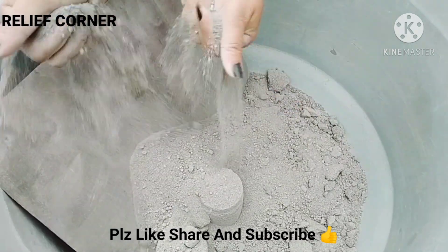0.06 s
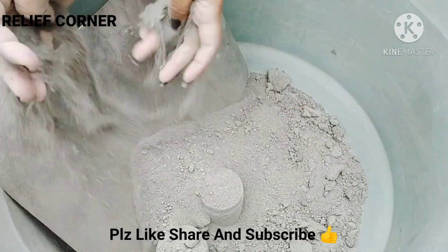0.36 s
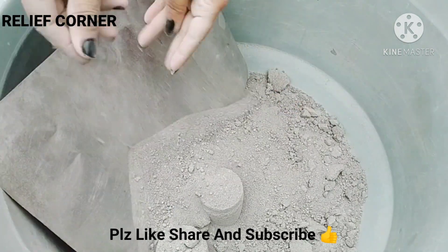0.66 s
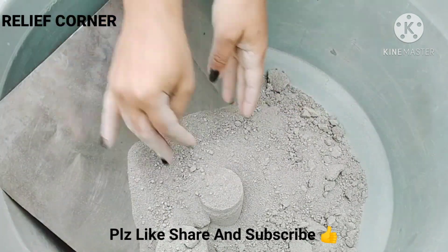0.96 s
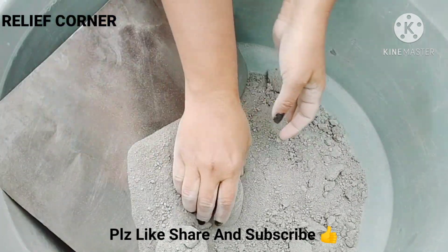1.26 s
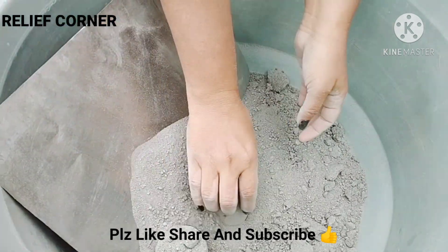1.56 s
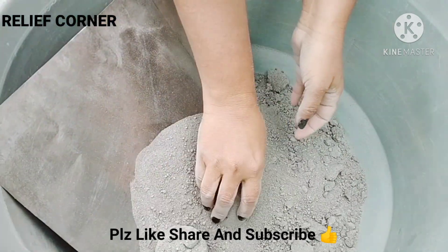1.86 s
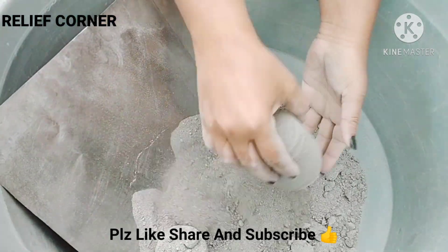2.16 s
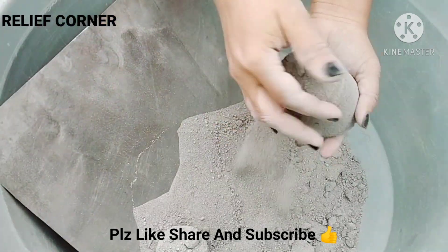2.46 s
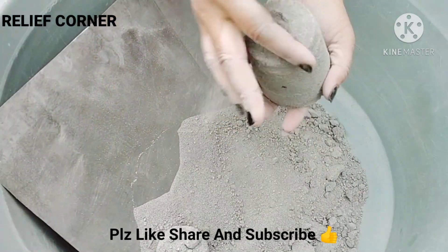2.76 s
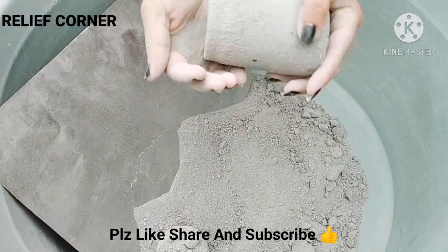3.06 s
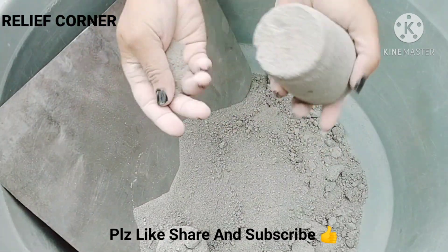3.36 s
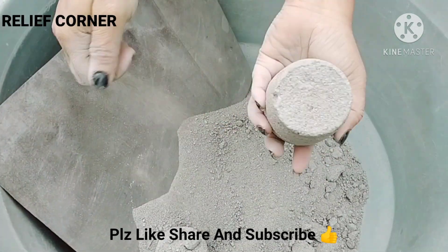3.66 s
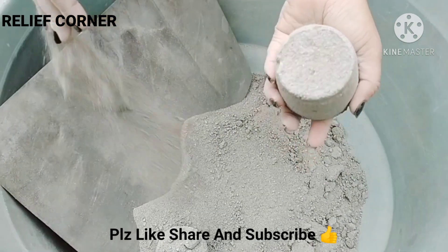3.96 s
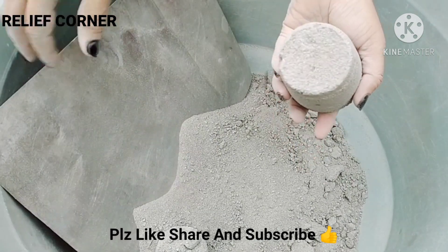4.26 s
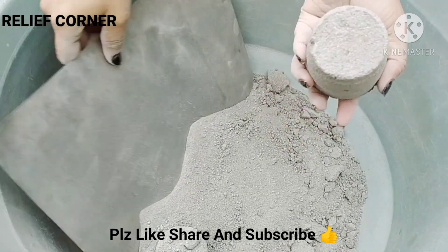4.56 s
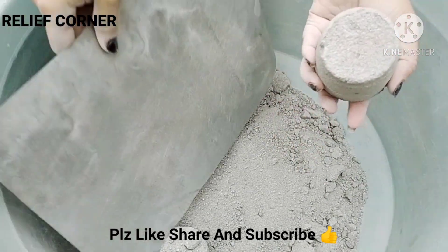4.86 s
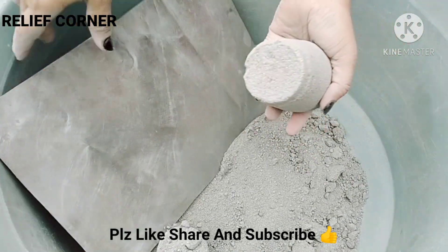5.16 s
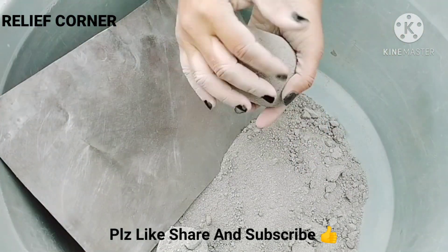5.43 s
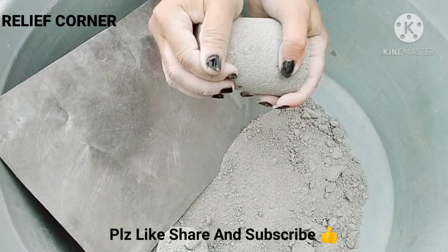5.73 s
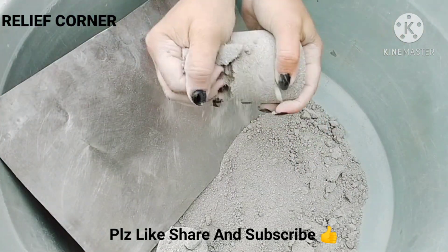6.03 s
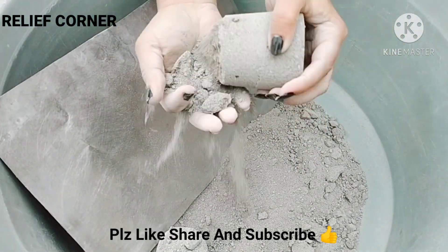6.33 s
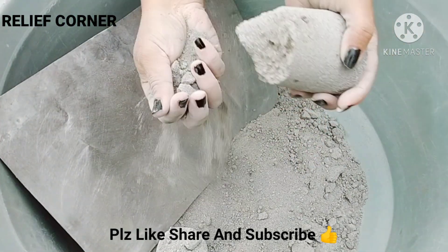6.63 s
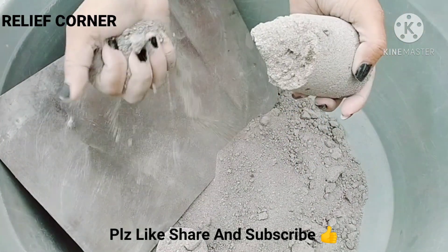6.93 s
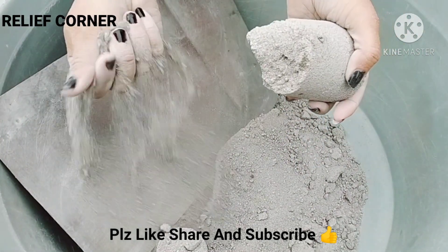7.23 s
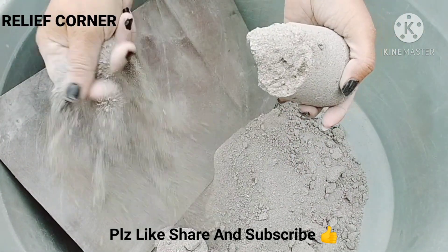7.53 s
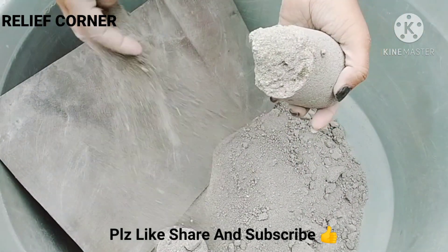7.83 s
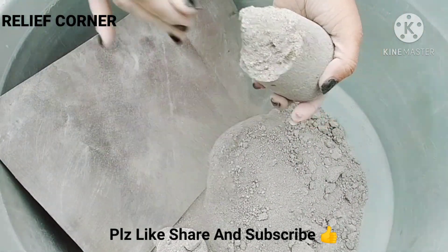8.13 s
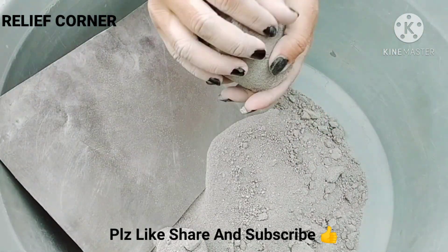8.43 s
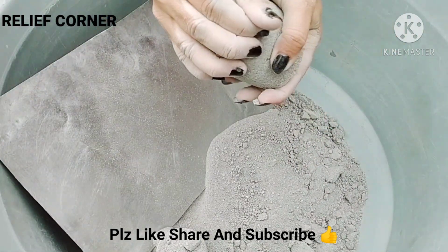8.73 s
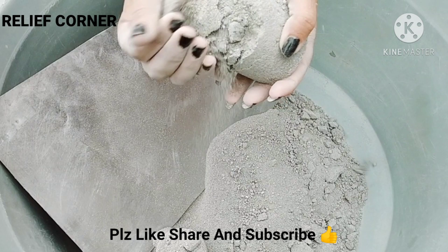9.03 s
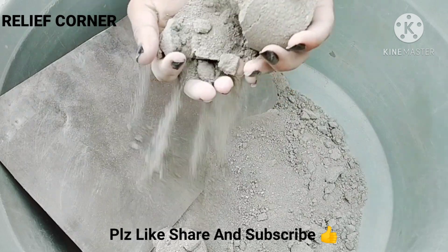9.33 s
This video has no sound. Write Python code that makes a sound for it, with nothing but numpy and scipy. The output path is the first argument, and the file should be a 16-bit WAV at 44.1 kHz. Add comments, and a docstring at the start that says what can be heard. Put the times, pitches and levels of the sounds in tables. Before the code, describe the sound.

Hands crumble dry sand cakes, grit pattering and powder hissing onto a thin sheet, with a scrape and a final sharp snap.

```python
"""Hands crush dry cakes of sand and cement: grit patters and powder hisses on a thin sheet in a plastic
basin, as dense tiny impacts filtered by the sheet's response. Crumbs and lumps burst, and heavier blows
ring the basin's modes. The sheet is shoved and scrapes by stick-slip; near the end one hard cake snaps.
Faint outdoor air, a low rumble and airy whistles lie underneath."""
import sys
import numpy as np
from scipy import signal
from scipy.fft import rfft, irfft, next_fast_len
from scipy.io import wavfile
from scipy.ndimage import map_coordinates

SR = 44100
rng = np.random.default_rng(int(sys.argv[2]) if len(sys.argv) > 2 else 0)


def waveform_to_disk(signal):
    """Save audio, clipped to [-1, 1], as 16-bit WAV at the path in sys.argv[1]."""
    frames = np.transpose(np.atleast_2d(signal))
    scaled = np.clip(frames, -1, 1) * 32767
    samples = np.round(scaled).astype(np.int16)
    wavfile.write(sys.argv[1], SR, samples)


N = 414099


def amp(db):
    """Decibels to gain."""
    return 10 ** (np.asarray(db) / 20)


def unit(x):
    """Scale to rms 1."""
    return x / np.sqrt(np.mean(x ** 2) + 1e-20)


def wobble(knots_per_s):
    """Smooth random curve."""
    knots = rng.standard_normal(int(N * knots_per_s / SR) + 4)
    return map_coordinates(knots, [np.arange(N) * knots_per_s / SR])


def band(x, lo_hz, hi_hz):
    """Brick-wall band-pass."""
    size = next_fast_len(N + SR // 2)
    hz = np.fft.rfftfreq(size, 1 / SR)
    return irfft(rfft(x, size) * ((hz >= lo_hz) & (hz < hi_hz)), size)[:N]


def colour(x, points, size=8192):
    """Minimum-phase filter of unit energy, shaped by (f/Hz, level/dB) points."""
    points_hz, points_db = np.transpose(points)
    hz = np.fft.rfftfreq(size, 1 / SR)
    gain = amp(np.interp(np.log(hz + 1), np.log(points_hz), points_db))
    cepstrum = irfft(np.log(gain))
    cepstrum[1:size // 2] *= 2
    cepstrum[size // 2 + 1:] = 0
    kernel = irfft(np.exp(rfft(cepstrum)))
    return signal.fftconvolve(x, kernel / np.linalg.norm(kernel))[:len(x)]


def grains(per_s, spread_db):
    """Tiny impacts of random time, size and sign; rms 1."""
    hit = rng.random(N) < per_s / SR
    size = amp(spread_db * np.clip(rng.standard_normal(N), -2, 2))
    return unit(hit * size * rng.choice([-1, 1], N))


def clumps(per_s, life_s, spread_db, share):
    """Gain of a stream with a share of its power in sudden, decaying clumps."""
    power = signal.lfilter([1], [1, -np.exp(-1 / (life_s * SR))], grains(per_s, spread_db) ** 2)
    return np.sqrt(1 - share + share * power / power.mean())


def strokes(rows, attack_s, fall_db_per_s):
    """Rise-hold-fall gain for each level column of (t/s, length/s, level/dB, ...) rows."""
    power = np.zeros((len(rows[0]) - 2, N))
    for start_s, length_s, *levels_db in rows:
        start = max(round(start_s * SR), 0)
        t = np.arange(start, min(start + 2 * SR, N)) / SR - start_s
        shape = np.clip(t / attack_s, 0, 1) * amp(-fall_db_per_s * np.maximum(t - length_s, 0))
        power[:, start:start + len(t)] += np.outer(amp(levels_db), shape) ** 2
    return np.sqrt(power)


def reflections(x, t60_s, cutoff_hz):
    """Short, dense, low-passed echo tail."""
    t = np.arange(SR // 2) / SR
    tail = rng.standard_normal(len(t)) * amp(-60 * t / t60_s) * (t > 0.002)
    tail = signal.lfilter(*signal.butter(2, cutoff_hz, fs=SR), tail / np.linalg.norm(tail))
    return signal.fftconvolve(x, tail)[:N]


# Air spectrum: f/Hz, relative level/dB
AIR_SPECTRUM = [(12, -47), (20, -7), (106, -3.5), (298, -13.5), (372, -19.5), (404, -17), (811, -22.5),
                (2840, -17.5), (4680, -30), (15500, -45)]
def air(level_db, waver_db):
    """Outdoor air: near-steady noise."""
    return amp(level_db + waver_db * wobble(5)) * unit(colour(rng.standard_normal(N), AIR_SPECTRUM))


# Rumble envelope: t/s, level/dB
RUMBLE_LEVELS = [(0, -61), (3.4, -71), (5.25, -57), (5.42, -47), (5.75, -53.5), (6.2, -58.5), (9.39, -60.5)]
# Rumble spectrum: f/Hz, relative level/dB
RUMBLE_SPECTRUM = [(20, -3), (60, -0.5), (90, -11.5), (128, 2), (180, -10), (400, -16.5), (1000, -21.5),
                   (4000, -41.5)]
def rumble():
    """Dull noise that swells as the sheet settles."""
    level_db = np.interp(np.arange(N) / SR, *np.transpose(RUMBLE_LEVELS))
    return amp(level_db) * unit(colour(rng.standard_normal(N), RUMBLE_SPECTRUM))


# Airy whistles: t/s, length/s, start f/Hz, end f/Hz, level/dB
WHISTLE_GLIDES = [(1.85, 0.87, 5260, 5600, -73), (4.13, .14, 5530, 4570, -51.5),
                  (8.192, .37, 5600, 5100, -67.5), (8.249, 0.93, 2866, 2183, -64)]
def whistles(width_hz, smear_s):
    """Narrow bands of hiss swell and glide; a faster glide widens the band."""
    out = np.zeros(N)
    for start_s, length_s, start_hz, end_hz, db in WHISTLE_GLIDES:
        progress = np.clip((np.arange(N) / SR - start_s) / length_s, 0, 1)
        phase = 2 * np.pi * np.cumsum(start_hz + (end_hz - start_hz) * progress) / SR
        band_hz = width_hz + smear_s * abs(end_hz - start_hz) / length_s
        hiss = wobble(band_hz) * np.sin(phase) + wobble(band_hz) * np.cos(phase)
        out += amp(db) * np.sin(np.pi * progress) * hiss
    return out


# Sheet sliding to rest: t/s, length/s, level/dB
DRONE_STROKES = [(5.25, 0.12, -49)]
def drone(pitch_hz, waver_hz):
    """Low, unsteady note of the whole sheet."""
    phase = 2 * np.pi * np.cumsum(pitch_hz + waver_hz * wobble(30)) / SR
    return strokes(DRONE_STROKES, SHOVE_ATTACK_S, fall_db_per_s=150)[0] * np.sin(phase)


# Dragged sheet's response: f/Hz, relative level/dB
SHEET_SPECTRUM = [(150, -29), (520, -3.5), (690, -11), (900, -2.5), (1430, -11), (1830, -2.5), (2350, -10),
                  (3270, -8), (3720, -4.5), (4200, -16.5), (6200, -24.5), (16000, -31)]
# Shoves of the sheet: t/s, length/s, scrape level/dB, sliding powder level/dB
SHEET_SHOVES = [(4.535, 0.1, -50.5, -55), (4.69, 0.059, -53, -51.5), (4.997, 0.044, -28, -39),
                (5.06, 0.11, -36.5, -37), (5.245, 0.058, -42, -42.5), (5.33, 0.018, -45.5, -56)]
SHOVE_ATTACK_S = 0.019
def scrape(rasp_db, rasp_hz, rasp_width_hz):
    """Sand under the edge makes the sheet stick, slip and ring; hard shoves add a bright rasp."""
    slips = grains(per_s=8000, spread_db=0.5)
    slips *= clumps(per_s=200, life_s=0.0069, spread_db=3.5, share=0.56)
    force = strokes(SHEET_SHOVES, SHOVE_ATTACK_S, fall_db_per_s=175)[0]
    ring = colour(slips, SHEET_SPECTRUM)
    rasp = signal.lfilter(*signal.iirpeak(rasp_hz, rasp_hz / rasp_width_hz, fs=SR), ring)
    return force * (ring + amp(rasp_db) * np.sqrt(force / force.max()) * rasp)


# Hollow basin modes: f/Hz, relative level/dB
BASIN_MODES = [(255, -5), (350, 1.5), (490, 1), (860, 3.5)]
# Blows on the basin, and a long ring after the sheet is knocked: t/s, level/dB, t60/s
BASIN_BLOWS = [(0.081, -42, 0.17), (0.136, -38, 0.082), (1.672, -50.5, 0.18), (4.614, -44, 0.17),
               (4.678, -40, 0.069), (4.71, -58, 1.6)]
def knocks(attack_s, phase_step_rad):
    """Heavier blows ring the basin's modes at random strengths; loose sand blurs the pitch."""
    t = np.arange(SR // 2) / SR
    rise = 1 - np.exp(-t / attack_s)
    out = np.zeros(N + SR)
    for start_s, blow_db, t60_s in BASIN_BLOWS:
        for hz, mode_db in BASIN_MODES:
            phase = 2 * np.pi * hz * t + phase_step_rad * np.cumsum(rng.standard_normal(len(t)))
            decay = amp(blow_db + mode_db + rng.normal(0, 1.9) - 60 * t / t60_s)
            out[round(start_s * SR):][:len(t)] += rise * decay * np.sin(phase)
    return out[:N]


# Crack spectrum: f/Hz, relative level/dB
CRACK_SPECTRUM = [(700, -25), (1300, -14.5), (1660, 6), (2150, -4.5), (3150, -6), (4000, -10),
                  (4800, -23.5), (16000, -25)]
# First give, then the break: t/s, impulse level/dB
FRACTURE_JUMPS = [(9.1574, -7.5), (9.16, 2.5), (9.1612, -3.5)]
def snap(chips_db, chips_t60_s):
    """A fracture crosses the hard cake in jumps, each trailed by tiny chips."""
    t = np.arange(SR // 10) / SR
    impulse = t == 0
    stress = np.zeros(N + SR)
    for start_s, db in FRACTURE_JUMPS:
        chips = amp(chips_db - 60 * t / chips_t60_s) * rng.standard_normal(len(t))
        stress[round(start_s * SR):][:len(t)] += amp(db) * (impulse + chips)
    return colour(stress[:N], CRACK_SPECTRUM)


# Grit on the sheet: f/Hz, relative level/dB
GRIT_SPECTRUM = [(130, -34), (280, -14.5), (510, -5), (680, -11), (880, -4.5), (1430, -9), (1870, -2.5),
                 (2350, -7.5), (3650, -4), (4600, -14.5), (6200, -31), (9500, -23), (16000, -63)]
def grit_patter(impacts):
    """Coarse grains sound the sheet's midrange."""
    return colour(impacts, GRIT_SPECTRUM)


# Powder on the sheet: f/Hz, relative level/dB
POWDER_SPECTRUM = [(300, -38.5), (1400, -13.5), (2600, -7), (3650, 2.5), (4400, -4), (6200, -14),
                   (7900, -7.5), (9100, -0.5), (10200, -3), (11500, -13.5), (14300, -4), (16000, -13)]
def powder_hiss(impacts):
    """Fine grains sound the sheet's treble."""
    return colour(impacts, POWDER_SPECTRUM)


def bursts(events, hit_db, hit_t60_s, grit_t60_s, dust_t60_s):
    """One hit per event, then a decaying scatter of grit (thud, crunch) and powder (spray)."""
    t = np.arange(SR // 3) / SR
    scatter_t60_s = np.array([[grit_t60_s], [grit_t60_s], [dust_t60_s]])
    shape = amp(hit_db - 60 * t / hit_t60_s) + amp(-60 * t / scatter_t60_s)
    gains = np.zeros((3, N + SR))
    for start_s, *levels_db in events:
        gains[:, round(start_s * SR):][:, :len(t)] += amp(levels_db)[:, None] * shape
    thud, crunch, spray = (gain * grains(per_s=9000, spread_db=7) for gain in gains[:, :N])
    thud = signal.lfilter(*signal.butter(2, 1250, "low", fs=SR), grit_patter(thud))
    crunch = signal.lfilter(*signal.butter(2, 1250, "high", fs=SR), grit_patter(crunch))
    return thud + crunch + powder_hiss(spray)


# Landing lumps: t/s, thud level/dB, crunch level/dB, spray level/dB
LUMP_LANDINGS = [(0.0746, -30, -30.5, -38.5), (0.1354, -37, -43, -36), (0.2807, -32.5, -29, -33.5),
                 (0.3262, -32.5, -34, -36), (1.6709, -37, -41.5, -72), (4.676, -29, -25, -60),
                 (6.9669, -38, -48, -36), (7.012, -29.5, -35, -37.5), (7.066, -39, -36, -32.5),
                 (7.129, -31, -25.5, -33), (7.39, -32, -33, -34), (7.9624, -37.5, -33, -54),
                 (8.069, -32.5, -38, -30), (9.2802, -35, -36.5, -37)]
def lumps():
    """Lumps land and burst; the powder outlasts the grit."""
    return bursts(LUMP_LANDINGS, hit_db=-2.5, hit_t60_s=0.0096, grit_t60_s=0.097, dust_t60_s=0.22)


def stray_crumbs(powder_flow, per_s, full_scale_db, db_per_flow_db, spread_db):
    """Random (t/s, level/dB) crumbs, stronger when more powder carries them."""
    at = np.flatnonzero(rng.random(N) < per_s / SR)
    flow_db = 20 * np.log10(powder_flow + 1e-9)
    level_db = full_scale_db + db_per_flow_db * flow_db + spread_db * rng.standard_normal(N)
    return list(zip(at / SR, level_db[at]))


# Crumbs snapping off between the fingers: t/s, level/dB
CRUMB_BREAKS = [(0.7485, -24.5), (0.8093, -28), (0.9475, -30.5), (0.9733, -42), (1.0055, -28.5),
                (1.0485, -33), (2.816, -43), (2.945, -41), (3.9594, -34), (3.9928, -29.5), (4.0114, -31),
                (4.128, -22.5), (4.248, -28.5), (5.7877, -40), (6.0563, -28), (6.2497, -40), (6.368, -34),
                (6.4672, -32), (6.4872, -31), (6.5241, -24.5), (6.6064, -25.5), (6.7164, -20.5),
                (6.793, -21.5), (8.6318, -40), (8.728, -35.5), (8.8797, -34.5), (9.0757, -20.5)]
# Blend of one crumb: thud, crunch, spray, each as relative level/dB
CRUMB_BLEND_DB = [-27, -22.5, -12.5]
def crumbs(powder_flow):
    """Small crumbs share one blend and burst more softly than lumps."""
    strays = stray_crumbs(powder_flow, per_s=13, full_scale_db=-8, db_per_flow_db=0.66, spread_db=1.5)
    events = [(start_s, *np.add(db, CRUMB_BLEND_DB)) for start_s, db in list(CRUMB_BREAKS) + strays]
    return bursts(events, hit_db=-14, hit_t60_s=0.026, grit_t60_s=0.12, dust_t60_s=0.099)


# Fingers rubbing a cake or the dusty sheet: t/s, length/s, grit level/dB, powder level/dB
FINGER_RUBS = [(0.75, .18, -68, -66), (1.45, 0.33, -70.5, -73), (2.0, 0.46, -66.5, -68.5),
               (2.33, .11, -59.5, -78), (3.28, 0.058, -87, -73), (3.5, 0.23, -79, -65),
               (4.2, 0.31, -66.5, -77), (4.75, 0.29, -61, -71.5), (5.25, 0.19, -56, -70),
               (5.62, 0.21, -64, -64), (6.2, 0.23, -68, -60), (8.25, 1, -65, -66)]
# Handfuls let go over the sheet: t/s, length/s, grit level/dB, powder level/dB
HANDFULS = [(-0.06, 0.24, -50, -42.5), (0.1, .11, -43.5, -39), (0.31, 0.3, -45, -38),
            (3.65, 0.061, -65.5, -61), (3.91, .22, -56, -50), (6.2, 0.049, -72, -53.5),
            (6.48, 0.12, -54.5, -41.5), (6.71, .14, -55.5, -44.5), (6.99, 0.44, -44.5, -37),
            (7.59, .17, -45, -34), (7.87, .23, -46, -38.5), (9.17, 0.068, -57, -52.5),
            (9.29, .15, -45, -37)]
def sand_flow():
    """Grit and powder envelopes: poured, rubbed-off and sliding sand add in power."""
    poured = strokes(HANDFULS, attack_s=0.049, fall_db_per_s=96.5)  # fingers open; stream runs dry
    rubbed = strokes(FINGER_RUBS, attack_s=0.047, fall_db_per_s=29)
    sliding = strokes(SHEET_SHOVES, SHOVE_ATTACK_S, fall_db_per_s=375)[1]
    grit, powder = np.hypot(poured, rubbed)
    return grit, np.hypot(powder, sliding)


def pour(grit_flow, powder_flow, grit_gain_db, powder_gain_db, full_flow_db, spurt_db, spurts_per_s):
    """Grit and powder rain on the sheet in shared clumps and spurts; thin powder comes in puffs."""
    grit = grit_patter(grains(per_s=3500, spread_db=1))
    grit /= band(grit, 300, 2200).std()
    powder = powder_hiss(grains(per_s=12000, spread_db=4))
    powder /= band(powder, 7000, 15500).std()
    thinness = 1 - np.minimum(powder_flow / amp(full_flow_db), 1)
    powder *= clumps(per_s=49, life_s=0.0077, spread_db=11.5, share=0.25 * thinness)
    stream = amp(grit_gain_db) * grit_flow * grit + amp(powder_gain_db) * powder_flow * powder
    stream *= clumps(per_s=150, life_s=0.0055, spread_db=1.5, share=0.71)
    return stream * amp(spurt_db * wobble(spurts_per_s))


def scene():
    """Sand and sheet echo inside the basin; the snap, up in the hands, is drier."""
    grit_flow, powder_flow = sand_flow()
    basin = pour(grit_flow, powder_flow, grit_gain_db=-2.5, powder_gain_db=-1,
                 full_flow_db=-45.5, spurt_db=1, spurts_per_s=42)
    basin += scrape(rasp_db=7.5, rasp_hz=4240, rasp_width_hz=1370)
    basin += drone(pitch_hz=126, waver_hz=5.5)
    basin += knocks(attack_s=0.0042, phase_step_rad=0.095)
    basin += crumbs(powder_flow) + lumps()
    basin += amp(-11) * reflections(basin, t60_s=0.025, cutoff_hz=12000)
    crack = snap(chips_db=-26, chips_t60_s=0.02)
    reverb = amp(-11.5) * reflections(basin + crack / 2, t60_s=0.27, cutoff_hz=4760)
    background = whistles(width_hz=330, smear_s=0.21) + air(level_db=-60.5, waver_db=0.34) + rumble()
    return (background + reverb + crack + basin)[None]


def record(dry):
    """Microphone band limit."""
    return band(dry[0], lo_hz=15, hi_hz=15750)[None]


dry = scene()
out = record(dry)
waveform_to_disk(out)
```